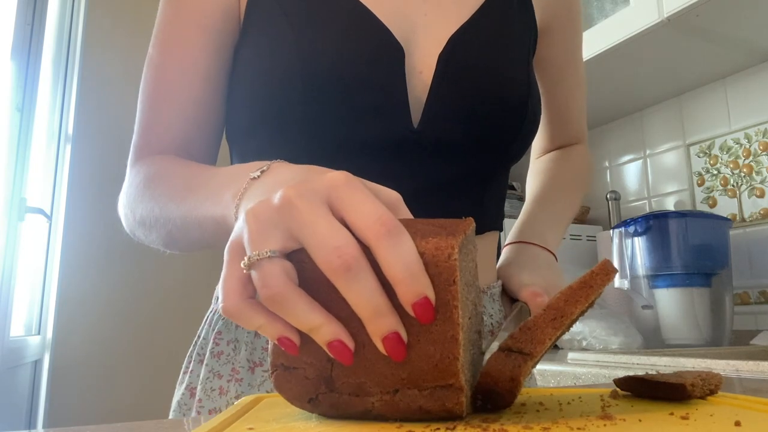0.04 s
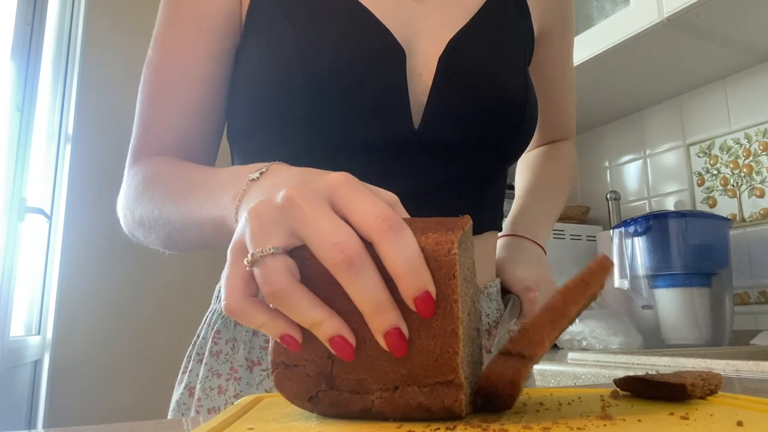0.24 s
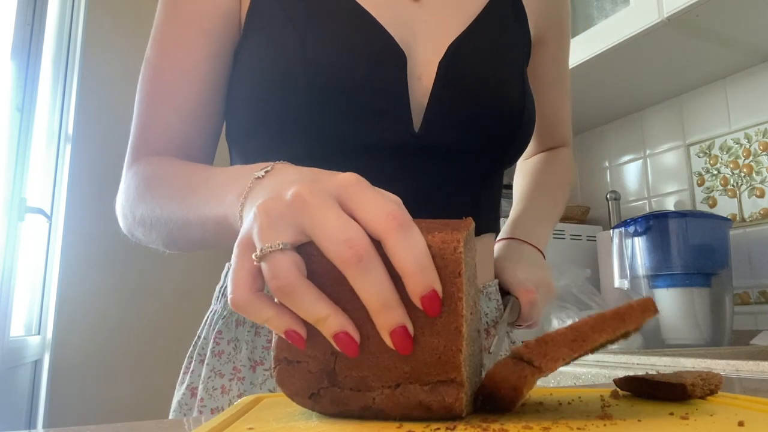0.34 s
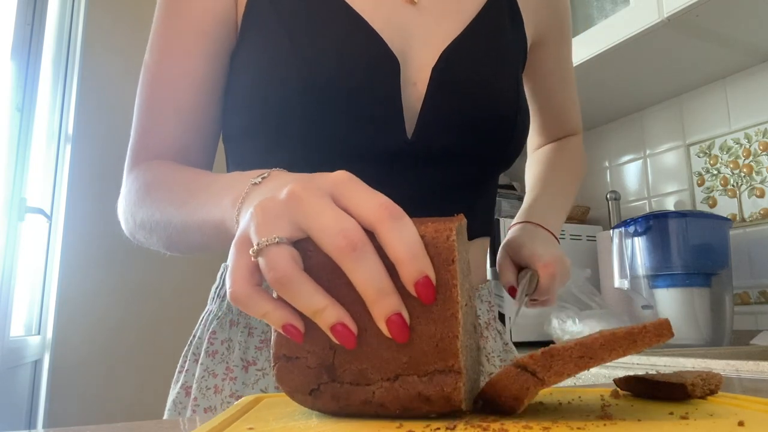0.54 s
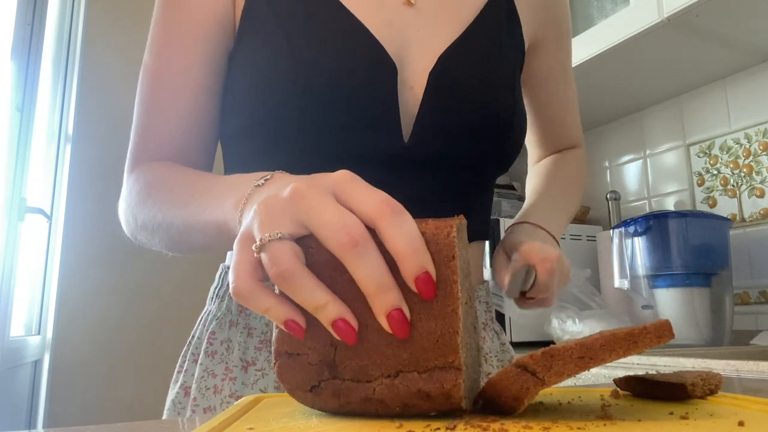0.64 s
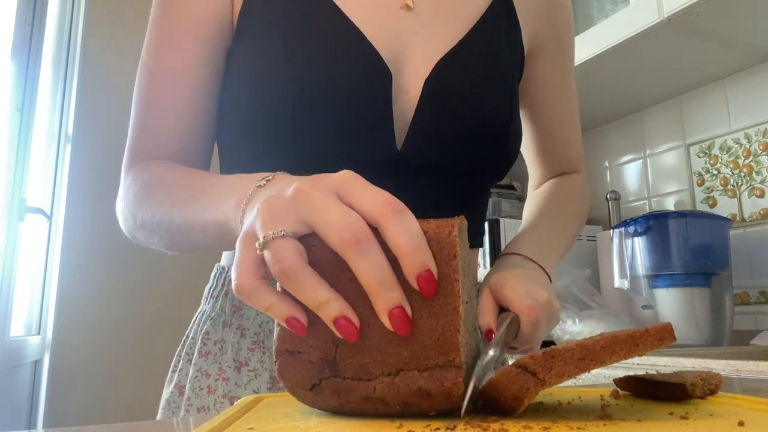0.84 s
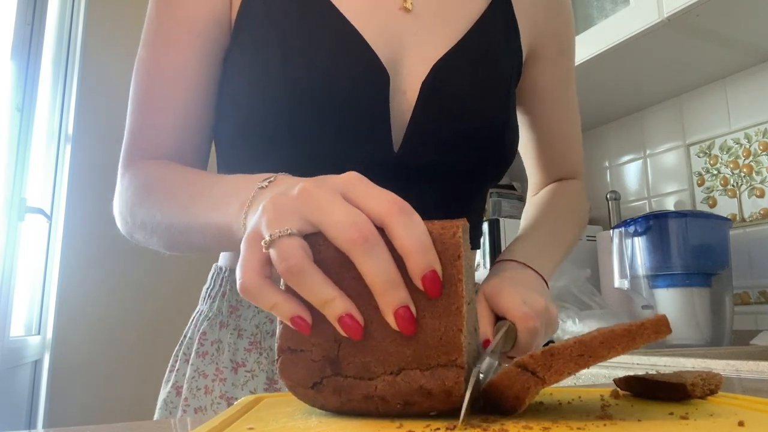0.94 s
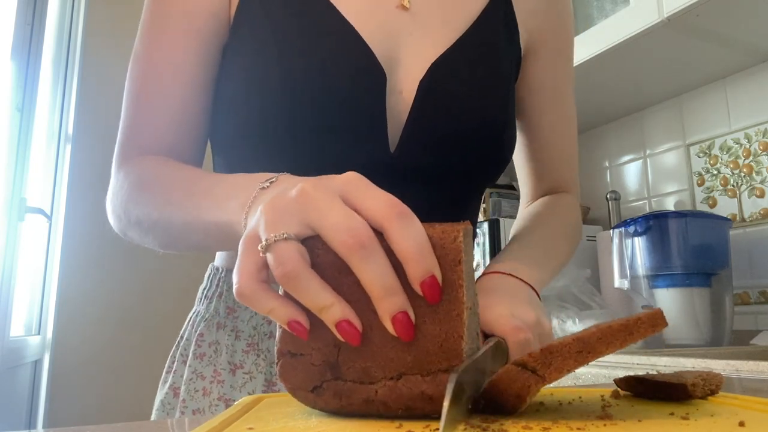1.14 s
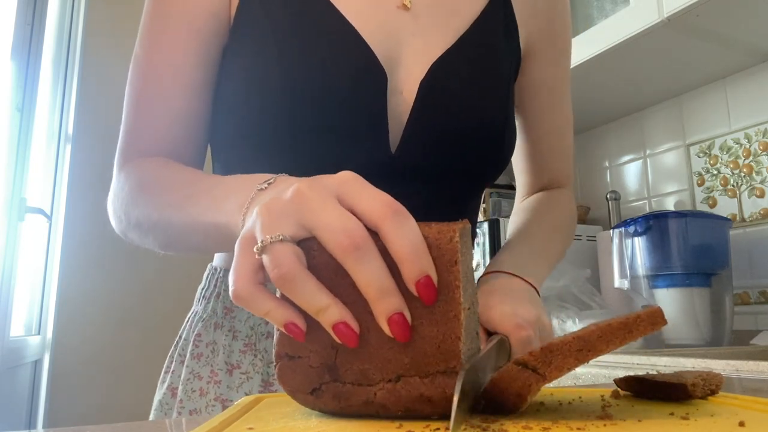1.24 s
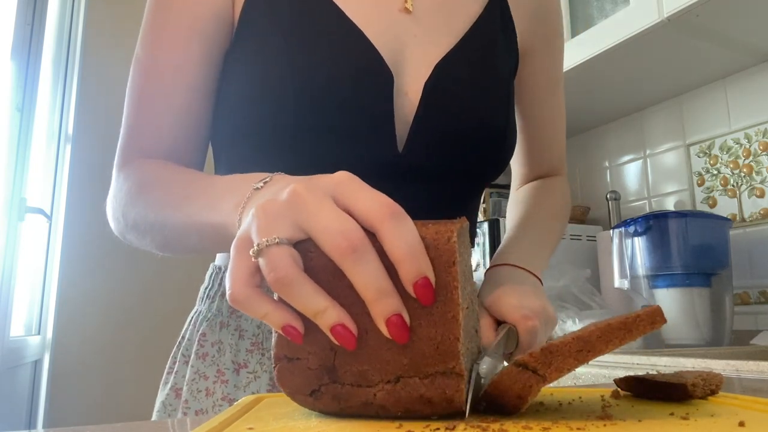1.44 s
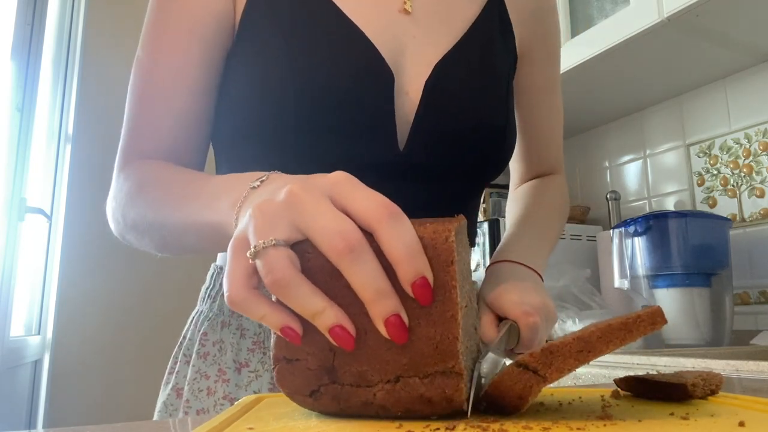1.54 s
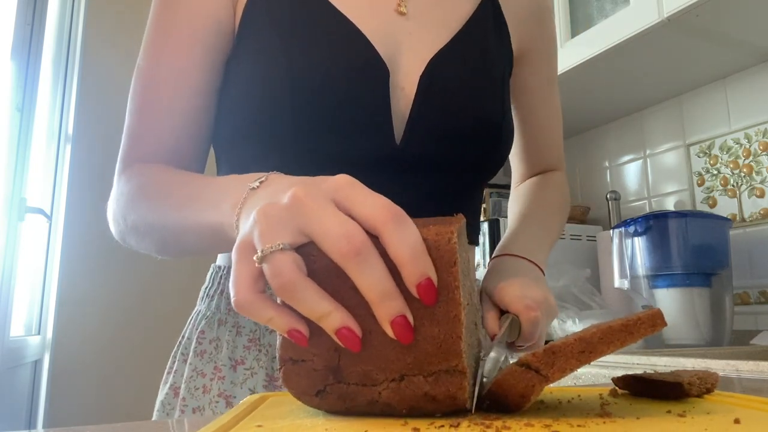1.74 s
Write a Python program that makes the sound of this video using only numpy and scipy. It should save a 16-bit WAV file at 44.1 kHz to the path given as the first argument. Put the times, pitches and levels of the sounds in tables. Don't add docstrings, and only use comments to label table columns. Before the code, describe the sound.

A serrated knife crunches through a crusty loaf, slaps the board, then saws the next slice

```python
import sys
import numpy as np
from scipy import signal
from scipy.fft import rfft, irfft
from scipy.io import wavfile
from scipy.ndimage import uniform_filter1d

SR = 44100
rng = np.random.default_rng(int(sys.argv[2]) if len(sys.argv) > 2 else 0)


def ratio_of_db(decibels):
    return 10 ** (np.asarray(decibels, float) / 20)


def unload_wav(signal):
    wavfile.write(
        sys.argv[1],
        SR,
        np.round(np.clip(np.atleast_2d(signal).T, -1, 1) * 32767).astype(np.int16),
    )


N = 79380

# f/Hz, level/dB
CRACK_COLOUR = [(590, -29.5), (1000, -0.5), (1770, -11), (3050, -10), (6470, -4), (8070, 1.5),
                (10800, -3.5), (13000, -17), (16000, -11.5)]
# f/Hz, level/dB, t60/s
COUNTER_MODES = [(199.1, -4, 0.28), (175.6, -14, 0.33), (184.5, -2.5, 0.098), (73.3, -15.5, 0.3)]
FIRST_TOUCH = 0.76


def evened(x):
    return x / np.sqrt(np.mean(x ** 2) + 1e-20)


def read(points, hz):
    f, value = np.transpose(points)
    return np.interp(np.log(hz + 1), np.log(f + 1), value)


def colour(x, points):
    log_gain = read(points, abs(np.fft.fftfreq(4096, 1 / SR))) * np.log(10) / 20
    taps = np.fft.ifft(np.exp(np.conj(signal.hilbert(log_gain)))).real[:1024]
    return signal.oaconvolve(x, taps / np.linalg.norm(taps))[:N]


def ring(x, modes, rise_s=1e-4):
    t = np.arange(SR // 2) / SR
    tap = sum(ratio_of_db(db - 60 * t / t60) * np.sin(2 * np.pi * hz * t) for hz, db, t60 in modes)
    return signal.oaconvolve(x, tap * (1 - np.exp(-t / rise_s)) / abs(tap).max())[:N]


def bursts(times, levels_db, lengths_s, touch=0):
    out = np.zeros(N + 2048)
    t = np.arange(2048) / SR
    noise = rng.standard_normal((len(times), 2048))
    for s, db, length, grain in zip(times, levels_db, lengths_s, noise):
        burst = grain * np.sqrt(t / length) * np.exp(-(t / length) ** 1.5)
        burst[1] = touch * np.linalg.norm(burst)
        out[round(s * SR):][:2048] += ratio_of_db(db) * burst / np.linalg.norm(burst)
    return out[:N]


def pushes(times, levels_db):
    lag_s = 0.00448
    out = np.zeros(N)
    out[np.round((np.array(times) + lag_s) * SR).astype(int)] = ratio_of_db(levels_db)
    return out


def whistle(x, hz, width_hz):
    turn = np.exp(2j * np.pi * np.cumsum(hz) / SR)
    r = np.exp(-np.pi * width_hz / SR)
    return 2 * (turn * signal.lfilter([1 - r], [1, -r], x / turn)).real


def fridge():
    # f/Hz, level/dB
    hum = [(121.4, -30)]
    waver_db = 0.4
    t = np.arange(N) / SR
    waver = evened(sum(np.sin(2 * np.pi * (f * t + rng.random())) for f in np.geomspace(.7, 6, num=8)))
    return sum(ratio_of_db(db + 5.0 + waver_db * waver) * np.sin(2 * np.pi * hz * t) for hz, db in hum)


def air():
    # f/Hz, level/dB
    air_colour = [(15, -64), (25, -11.5), (126, -11.5), (173, -16), (392, -31.5), (599, -32), (3630, -63.5),
                  (8030, -59.5), (14000, -102.5)]
    # f/Hz, likeness/1
    likeness = [(60, 1), (250, 0.58), (1000, 0.31), (8000, 0.21)]
    level_db = -37
    hz = np.fft.rfftfreq(2048, 1 / SR)
    a, b, c, d = rng.standard_normal((N // 512 + 5, 1025, 4)).T
    same = np.clip(read(likeness, hz), -1, 1)[:, None]
    left = a + 1j * b
    right = same * left + np.sqrt(1 - same ** 2) * (c + 1j * d)
    z = np.array([left, right]) * ratio_of_db(read(air_colour, hz)[:, None])
    return ratio_of_db(level_db) * evened(signal.istft(z, nperseg=2048, noverlap=1536)[1][:, :N])


def crumb_tears():
    tears_per_s, spread_db, clump_db = 20000, 2, 4.5
    force = ratio_of_db(spread_db * np.minimum(rng.exponential(1, N), 4)) * rng.standard_normal(N)
    tears = force * (rng.random(N) < tears_per_s / SR)
    slow = uniform_filter1d(uniform_filter1d(rng.standard_normal(N), size=300), size=300)
    return evened(tears * ratio_of_db(clump_db * evened(slow)))


def teeth_whistles(press):
    # t/s, low f/Hz, high f/Hz, level/dB
    stroke = [(.96, 700, 1350, 2), (1.0, 754, 1440, 16), (1.03, 820, 1510, 18.5), (1.053, 1010, 1700, 21),
              (1.07, 783, 1360, 21), (1.09, 706, 1220, 16), (1.11, 715, 1020, 14), (1.24, 776, 1530, 2),
              (1.3, 810, 1640, 8), (1.38, 785, 1950, 11), (1.43, 730, 1860, 13), (1.52, 740, 1630, 13.5)]
    t = np.arange(N) / SR
    at, low_hz, high_hz, teeth_db = np.transpose(stroke)
    rub = press * ratio_of_db(np.interp(t, at, teeth_db, -60, -60))
    return sum(whistle(rub, np.interp(t, at, hz), width_hz=90) for hz in (low_hz, high_hz))


def rasp():
    # t/s, tearing level/dB, pressure level/dB
    sawing = [(0, -44.5, -35), (0.052, -60.5, -51), (0.188, -52, -44), (0.253, -25, -18), (.30, -52, -27),
              (0.519, -59.5, -59), (0.558, -52, -51.5), (0.662, -60, -50), (0.86, -71.5, -61),
              (0.873, -45, -41), (0.916, -55.5, -46), (1.037, -42.5, -33), (1.114, -40, -31),
              (1.197, -54, -48), (1.256, -38.5, -29), (1.462, -45, -35), (1.579, -63.5, -48),
              (1.698, -53.5, -42)]
    # f/Hz, level/dB
    tear_colour = [(1500, -27.5), (2500, -6.5), (5500, -5.5), (7000, -5), (8000, 3.5), (9500, -9),
                   (11500, -9), (14500, -21)]
    # f/Hz, level/dB
    body_colour = [(100, -23.5), (300, 3.5), (800, 0.5), (1500, -3), (2200, -8.5), (4000, -39), (9000, -38)]
    # f/Hz, level/dB, t60/s
    blade_modes = [(784.4, -3, 0.098), (1434, -26, 0.0083), (403, -4, 0.03)]
    tear_gain_db, board_db, counter_db = 6.5, -24, -24
    new_slice_s, smooth_share = 0.86, 1.2
    s, tear_db, press_db = np.transpose(sawing)
    t = np.arange(N) / SR
    tears = crumb_tears()
    rough = np.roll(tears, SR // 3)
    press = evened(rough + smooth_share * rng.standard_normal(N)) * ratio_of_db(np.interp(t, s, press_db))
    tearing = colour(tears * ratio_of_db(tear_gain_db + np.interp(t, s, tear_db)), tear_colour)
    blade = ring(press * (t > new_slice_s), blade_modes) * ratio_of_db(board_db)
    body = colour(press, body_colour)
    counter = ring(press, COUNTER_MODES) * ratio_of_db(counter_db)
    return tearing + blade + body + counter + teeth_whistles(press)


def snaps():
    # t/s, peak level/dB, board share level/dB, length/ms
    cracks = [(0.039, -44, -17, 0.36), (.052, -38.5, -20, .5), (0.063, -37, -11.5, 0.98),
              (0.082, -35.5, -23, 0.59), (0.0975, -14.5, -9.5, 1.2), (.171, -19.5, -24, 2.2),
              (0.18, -29, 3, 0.62), (0.199, -22, -1, 0.97), (0.2063, -15.5, 2.5, 0.78),
              (0.2086, -12.5, 1, 2), (0.2237, -25.5, 12.5, 1.8), (0.2349, -24, -2, 0.68),
              (0.262, -3, -16, 0.87), (0.4323, -20, -1, 2.2), (0.531, -26.5, -57, 0.81),
              (0.544, -21.5, -33, 4.5), (0.549, -29, -33, 2.1), (.625, -33, -9, 2.3),
              (.633, -29.5, -8, 3.8), (.701, -52.5, -20, .7), (.709, -44, -12, .9), (0.73, -41, -13, 0.99),
              (.766, -40, -12, 1.6), (.782, -42, -17.5, 1.3), (0.871, -42, -24.5, 2.7),
              (.875, -49, -24, 1.3), (0.899, -35, -31.5, 0.41), (0.929, -17.5, -12.5, 2.4),
              (0.934, -21, -22, 2.1), (0.968, -22.5, -18, 5.4), (1.006, -20, -25, 1.54),
              (1.029, -26.5, 0, 1.5), (1.141, -6, -22, 1.56), (1.1947, -22.5, -31, 0.27),
              (1.248, -18.5, -2, 4.1), (1.284, -24, -19, 1.2), (1.3158, -1.5, -4.5, 0.58),
              (1.358, -30, -23, 0.65), (1.38, -23.5, -20, 0.24), (1.431, -32, -17, 0.57),
              (1.469, -25.5, -30, 0.87), (1.5379, -16.5, -48, 2.2), (1.641, -23, -33, .9),
              (1.656, -37, -25, .6), (1.680, -31.5, -18, 2.3), (1.730, -29, -2, 1.2), (1.773, -63, -25, .6),
              (1.791, -18.5, -43, 1.7)]
    # f/Hz, level/dB, t60/s
    board_modes = [(1000, -6, .012), (1400, 0, .02), (1900, -4, .012), (3300, -6, .005)]
    lead_s, tick_db, body_db = 0.00017, 1.5, 8
    s, db, board_db, ms = np.transpose(cracks)
    tick = bursts(s - lead_s, db + 13.5, ms / 1000, touch=0.71)
    body = bursts(s, db + board_db + body_db, ms / 1000, FIRST_TOUCH)
    return ratio_of_db(tick_db) * colour(tick, CRACK_COLOUR) + ring(body, board_modes)


def blows(table, modes, hiss_db, touch):
    s, db, counter_db, length_s = np.transpose(table)
    contact = bursts(s, db, length_s, touch)
    hiss = ratio_of_db(hiss_db) * colour(contact, CRACK_COLOUR)
    boom = ring(pushes(s, counter_db), COUNTER_MODES, rise_s=0.00076)
    return ring(contact, modes) + hiss + boom


def blade_slaps():
    # t/s, board level/dB, counter level/dB, contact/s
    slap_table = [(.172, -13, -32, 0.0017), (.2065, -2.5, -34, 0.0022), (.222, -3, -16, 0.0025),
                  (.236, -13, -35, 0.0019), (.243, -3, -38, 0.014), (.2495, -1.5, -36, 0.0032),
                  (.2535, 16.5, 4.5, 0.0034), (.259, -5, -13.5, 0.0021), (.264, 2, -30, 0.0066),
                  (.431, -36, -20.5, 0.00061), (1.725, -17.5, -52, 0.00065)]
    # f/Hz, level/dB, t60/s
    slap_modes = [(512, -10, 0.027), (828, -6.5, 0.033), (1330, -13, 0.013), (1292, -1, 0.045),
                  (1584, 1.5, .016), (1756, 6, 0.022), (1950, -14.5, 0.042), (2340, -4.5, 0.009),
                  (2450, -23, .012)]
    return blows(slap_table, slap_modes, hiss_db=-6, touch=0.33)


def blade_ping():
    # f/Hz, level/dB, t60/s
    ping_modes = [(760, 2, .05), (3300, -12, .04), (4000, -12, .05), (4800, -8, .06), (6200, -10, .04),
                  (7850, -3, .05), (9300, -8, .05), (11200, -8, .05)]
    return ring(bursts([0.870], [-31], [0.004]), ping_modes)


def knocks():
    # t/s, board level/dB, counter level/dB, contact/s
    knock_table = [
        (.872, -29.5, -37, 0.01),
        (.908, -41, -26, 0.0014),
        (.970, -22.5, -17.5, 0.0026),
        (1.005, -25, -41, 0.0022),
        (1.114, 6, -8.5, 0.0013),
        (1.142, -11, -9, 0.00096),
        (1.2275, -5, -10.5, 0.00036),
        (1.382, -12.5, -40, 0.017),
        (1.413, -34, -20, 0.0018),
        (1.636, -19.5, -50, 0.014),
    ]
    # f/Hz, level/dB, t60/s
    knock_modes = [(438, -2.5, 0.031), (295, -15, 0.022), (758, 3.5, 0.025), (1027, -16, 0.12),
                   (1405, 3, 0.022), (1736, -11.5, 0.036), (2470, -14, 0.05)]
    return blows(knock_table, knock_modes, hiss_db=-13.5, touch=FIRST_TOUCH)


def loaf_bump():
    # f/Hz, level/dB, t60/s
    bump_modes = [(68.7, 0, 0.154)]
    return ring(pushes([1.165], [-16]), bump_modes, rise_s=0.0037)


def kitchen(x):
    # f/Hz, t60/s
    decay = [(150, .25), (700, .34), (2000, .36), (8000, .3)]
    # f/Hz, level/dB
    echo_colour = [(200, -3.5), (320, 2), (1200, -5), (2600, 2), (4500, 1), (15000, -5.5)]
    taps = np.zeros((2, SR // 2))
    at = np.arange(20, SR // 2 - 20, 20) + rng.integers(0, 20, (2, (SR // 2 - 21) // 20))
    np.put_along_axis(taps, at, rng.choice([-1., 1.], at.shape), 1)
    hz, t, z = signal.stft(taps, SR, nperseg=256)
    fade_db = read(echo_colour, hz)[:, None] - 60 * t / read(decay, hz)[:, None]
    tail = signal.istft(z * ratio_of_db(fade_db), SR, nperseg=256)[1]
    return signal.fftconvolve(x[None], tail / 8, axes=1)[:, :N]


def ports(x):
    # f/Hz, phase/rad
    port_phase = [(60, -1.5), (300, 0.78), (1200, 1.69), (2500, 1.2), (5000, 1.43), (8000, 1), (11000, 2),
                  (14000, 1.4)]
    turn = np.exp(.5j * read(port_phase, np.fft.rfftfreq(N, 1 / SR)))
    return np.array([irfft(rfft(x) * turn, N), irfft(rfft(x) / turn, N)])


def treble_gate(x):
    from_hz, gate_db, spread_db = 9700, -17, 3.5
    hz, t, z = signal.stft(x, SR, nperseg=1024, noverlap=768)
    power = (abs(z[:, :512]) ** 2).mean(0).reshape(32, 16, -1).mean(1) + 1e-20
    cover_db = uniform_filter1d(10 * np.log10(power[9:13].mean(0)), size=15)
    patches = evened(uniform_filter1d(rng.standard_normal((len(t), 32)), size=12, axis=0)).T
    band_db = 10 * np.log10(uniform_filter1d(power, size=3))
    shut = band_db < cover_db + gate_db + spread_db * patches
    shut = np.repeat(shut, 16, axis=0)[np.minimum(np.arange(513), 511)]
    shut = shut & (hz > from_hz)[:, None]
    return signal.istft(z * ~shut, SR, nperseg=1024, noverlap=768)[1][:, :N]


def scene():
    near = rasp() + snaps() + blade_slaps() + blade_ping() + knocks() + loaf_bump()
    echo_db = -8
    return ports(near + fridge()) + ratio_of_db(echo_db) * kitchen(near) + air()


def roll_off(x):
    return signal.sosfilt(signal.butter(12, 16380, fs=SR, output="sos"), x)


def record(dry):
    # f/Hz, level/dB
    treble_shape = [(9700, 0), (10200, -15), (10900, -14), (11400, 0), (14200, 0), (15000, -14)]
    low_cut = signal.butter(1, 85, "high", fs=SR, output="sos")
    cut = signal.sosfilt(low_cut, dry)
    heard = irfft(rfft(cut) * ratio_of_db(read(treble_shape, np.fft.rfftfreq(N, 1 / SR))), N)
    overloaded = np.clip(heard, -1, 1)
    mix = np.clip(treble_gate(overloaded), -1, 1)
    return roll_off(mix)


dry = scene()
out = record(dry)
unload_wav(out)
```